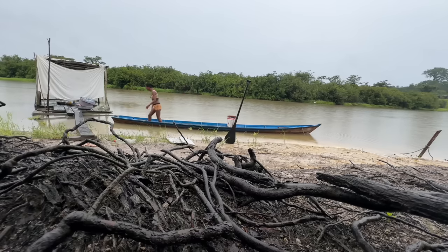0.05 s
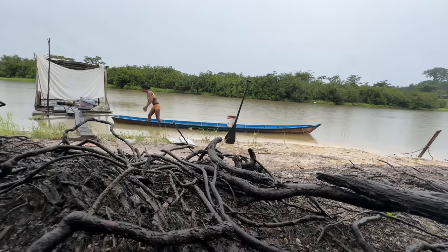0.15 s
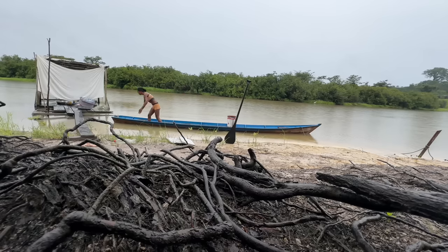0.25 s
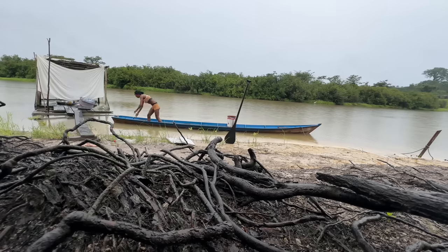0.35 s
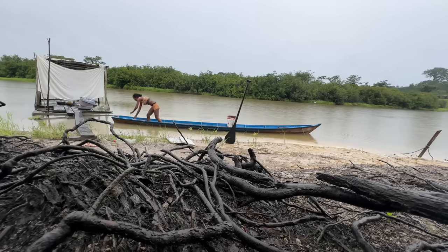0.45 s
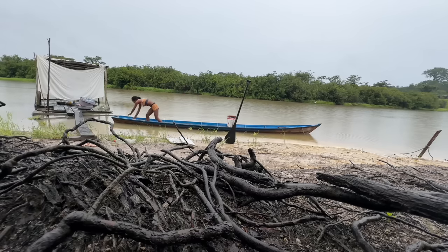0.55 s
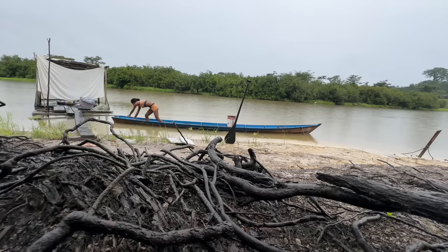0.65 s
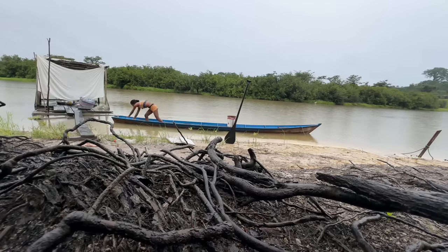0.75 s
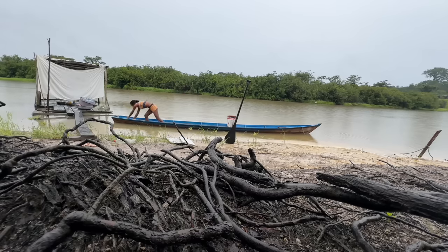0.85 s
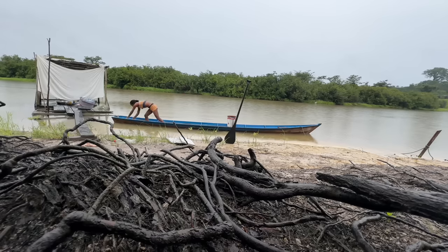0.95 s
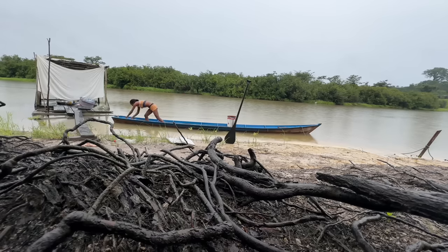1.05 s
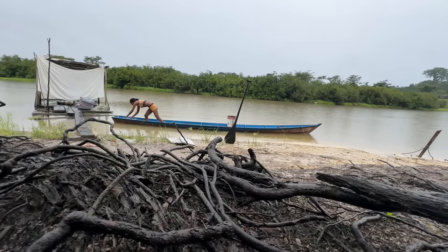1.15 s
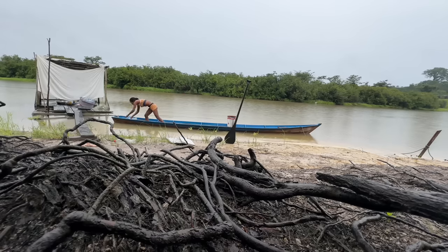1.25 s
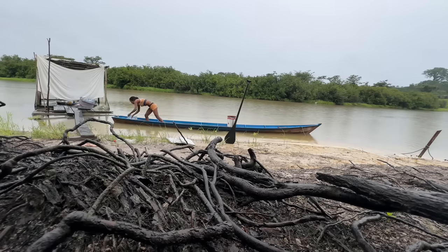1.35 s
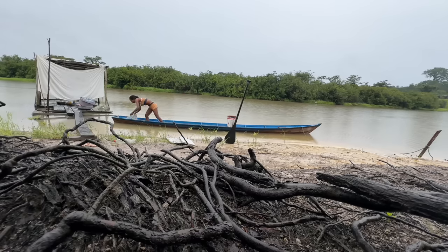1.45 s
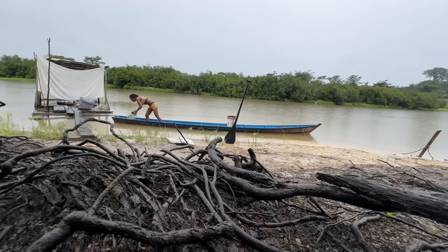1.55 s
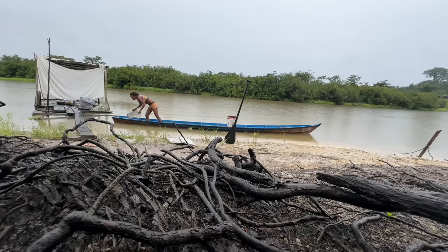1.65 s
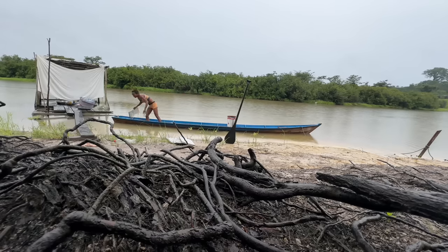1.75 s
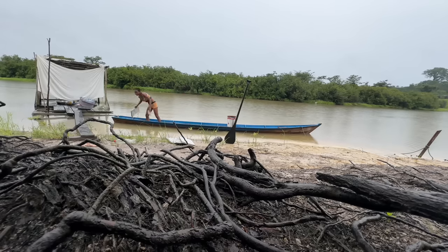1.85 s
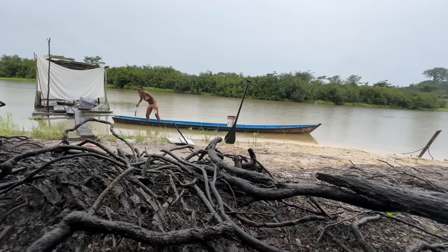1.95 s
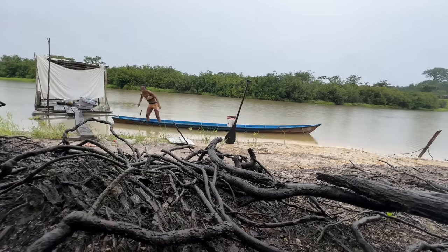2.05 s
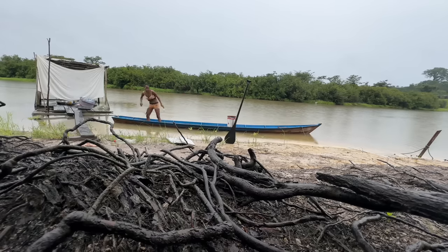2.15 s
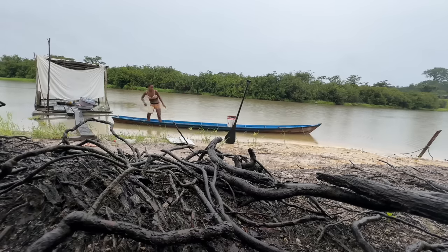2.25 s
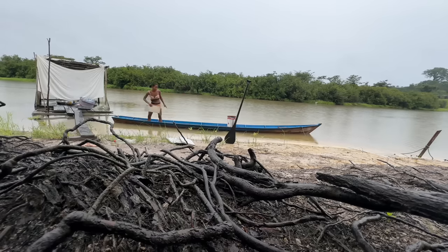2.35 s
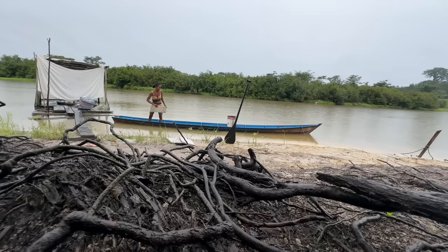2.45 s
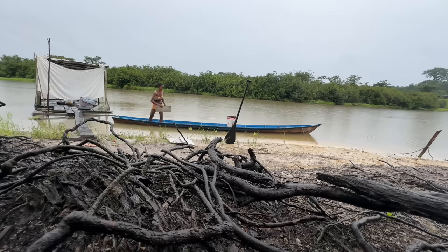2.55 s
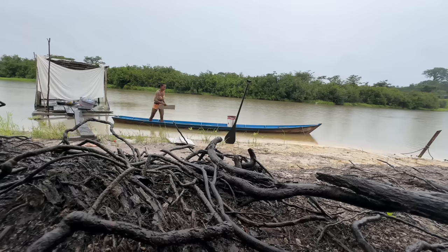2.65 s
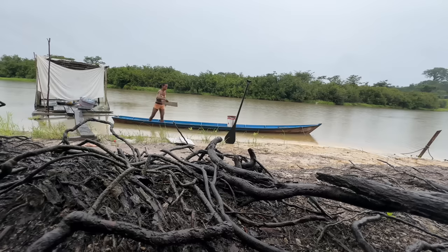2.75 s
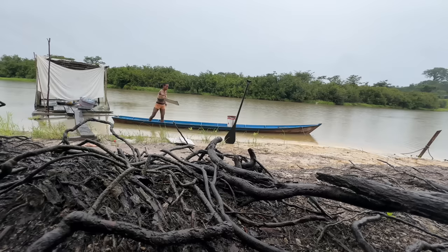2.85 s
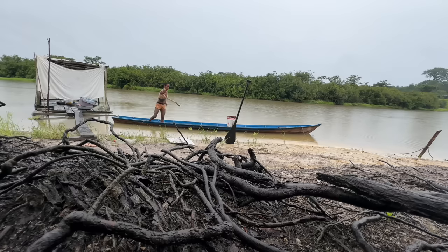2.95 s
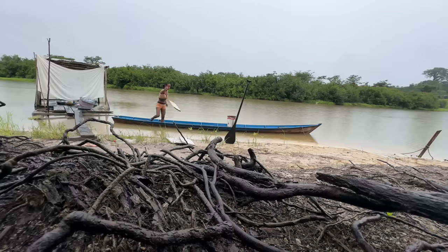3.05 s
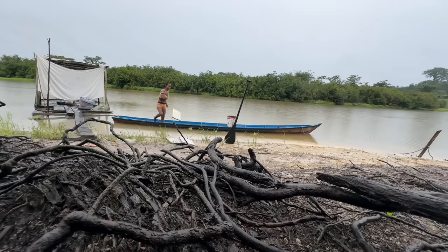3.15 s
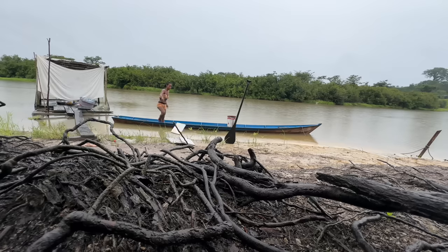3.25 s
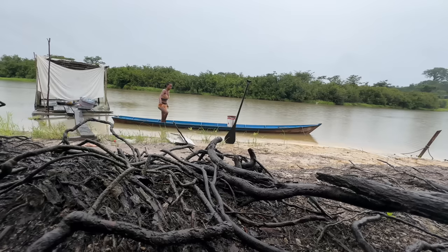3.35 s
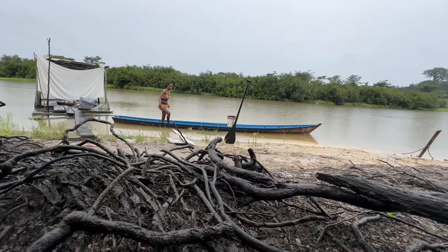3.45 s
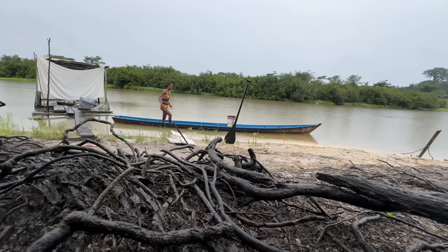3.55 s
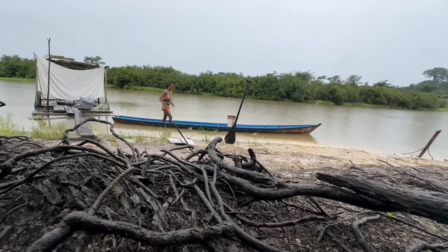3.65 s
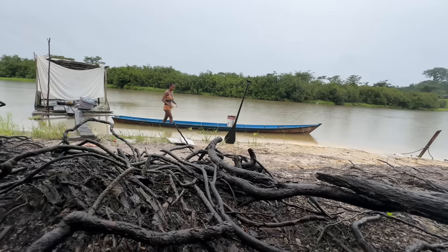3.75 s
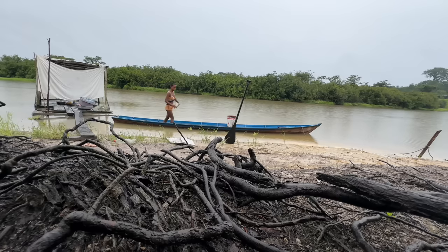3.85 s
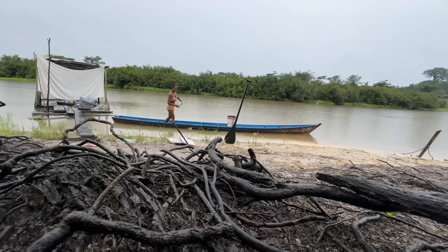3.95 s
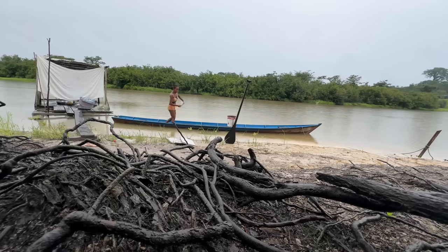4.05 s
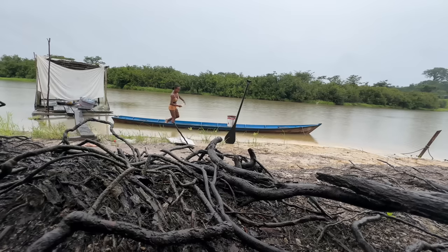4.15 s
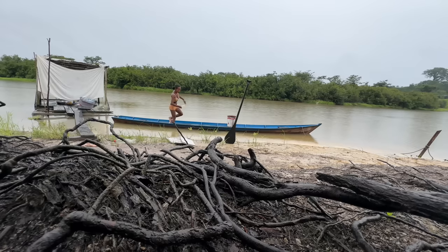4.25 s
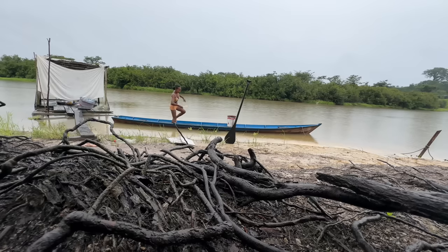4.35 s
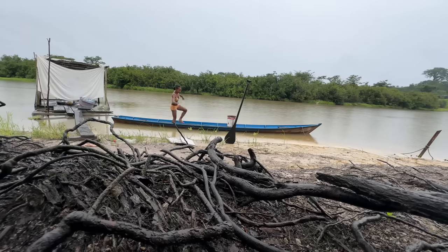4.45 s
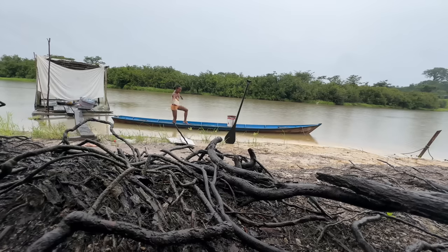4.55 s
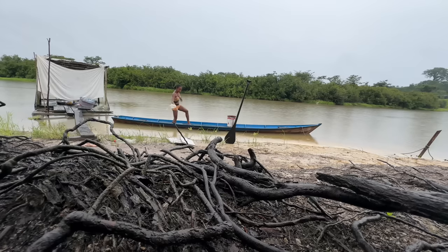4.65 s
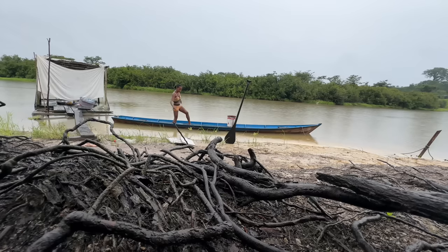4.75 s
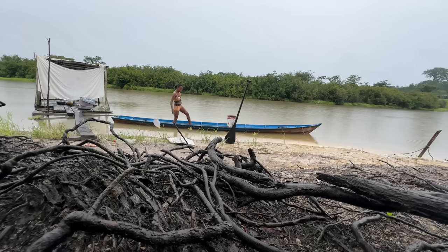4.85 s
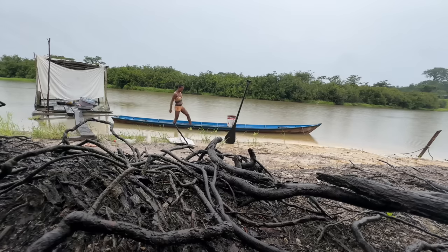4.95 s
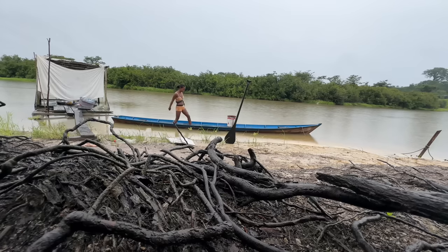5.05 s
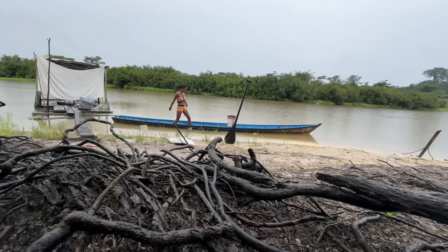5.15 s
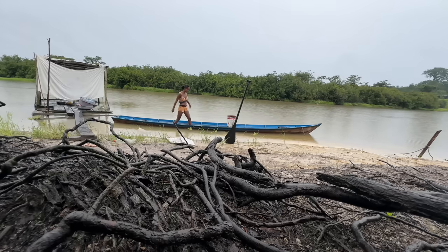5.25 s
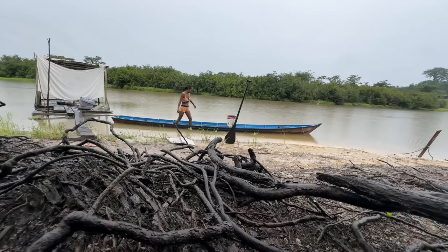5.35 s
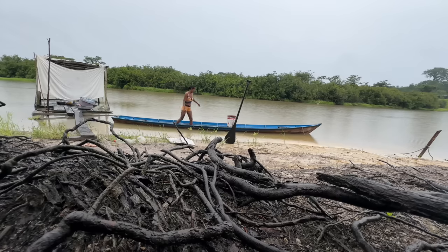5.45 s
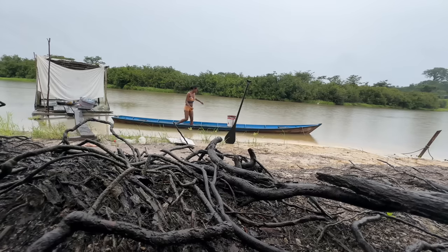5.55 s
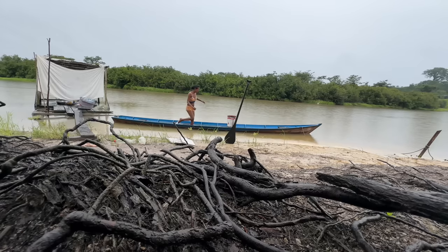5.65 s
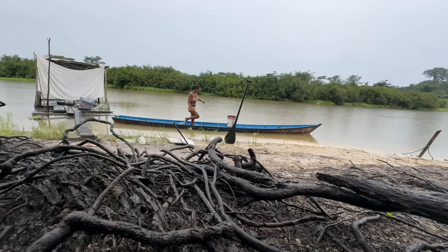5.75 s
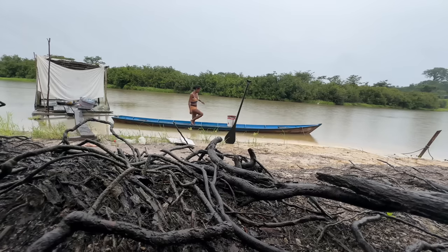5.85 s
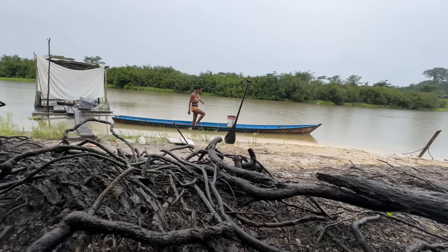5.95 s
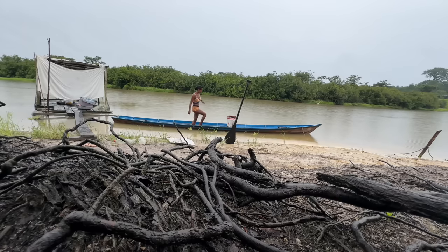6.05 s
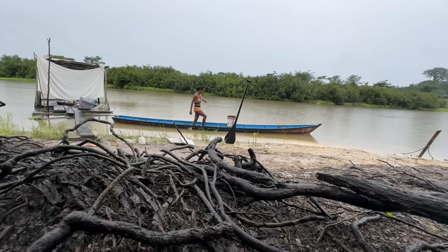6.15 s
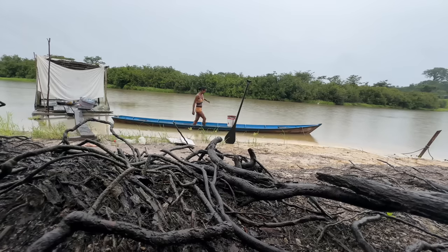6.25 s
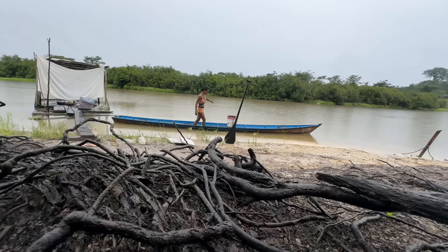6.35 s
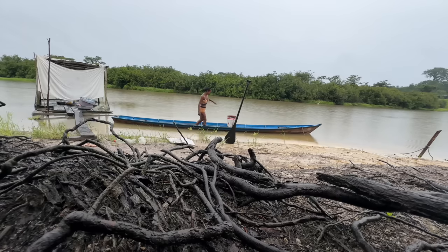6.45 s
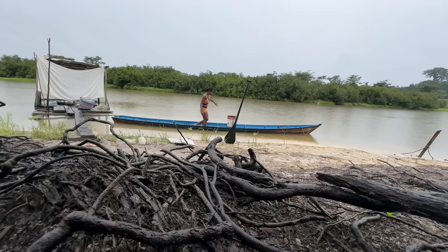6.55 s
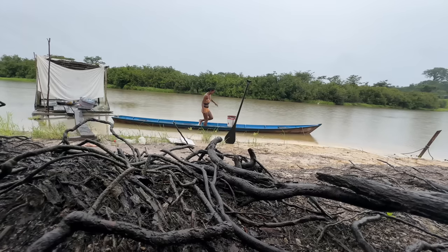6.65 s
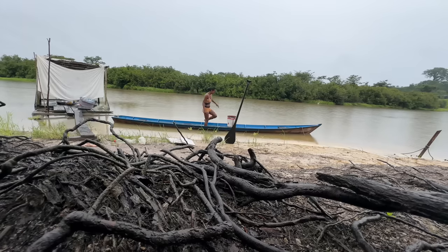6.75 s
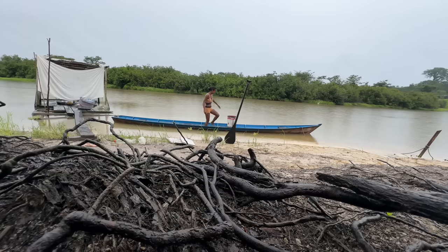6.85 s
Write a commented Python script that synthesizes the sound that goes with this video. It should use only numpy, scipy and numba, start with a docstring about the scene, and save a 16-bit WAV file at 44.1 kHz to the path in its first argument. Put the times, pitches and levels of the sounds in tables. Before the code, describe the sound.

A plastic bucket knocks a hollow canoe hull, then clatters hard when tossed, amid slaps, gurgles, drips and small splashes of water by a quiet river.

```python
"""A plastic bucket knocks, scoops and empties in a flooded canoe, while someone wades along the hull.
Water moves from the start; at about 1 s the bucket knocks the hull, and slaps, bubbles and spray follow.
Near 2.4 s a low rumble puffs and a far bird calls; at 3.3 s the tossed bucket bounces and its air rings.
At 4.8 s an air pocket closes with a rising glug, then drips and small splashes go on to the end.
Bucket, bubbles and calls are sine tones, slaps are noise bursts; river air and insects are steady filtered noise."""
import sys
import numpy as np
from scipy import signal
from scipy.fft import rfft, irfft
from scipy.io import wavfile
from scipy.ndimage import uniform_filter1d
from numba import njit

SR = 44100
rng = np.random.default_rng(int(sys.argv[2]) if len(sys.argv) > 2 else 0)


def unload_audio(sound):
    """Save the sound as a 16-bit wav file, at the path given as the first command line argument."""
    columns = np.transpose(np.atleast_2d(sound))
    # keep every value between -1 and 1, then stretch to whole-number steps
    steps = np.round(np.clip(columns, -1, 1) * 32767)
    wavfile.write(sys.argv[1], SR, steps.astype(np.int16))


N = 304731
T = np.arange(N) / SR


def undb(db):
    """Gain of a level in dB."""
    return 10 ** (np.asarray(db) / 20)


def unit(x):
    """Scales a sound to rms 1."""
    return x / np.sqrt(np.mean(x ** 2))


def noise(count=N):
    """White noise."""
    return rng.standard_normal(count)


def band(x, lo_hz, hi_hz, order=2):
    """Keeps the pitches between two limits (Butterworth band-pass)."""
    limits_hz = [lo_hz, min(hi_hz, .45 * SR)]
    return signal.sosfilt(signal.butter(order, limits_hz, "band", fs=SR, output="sos"), x)


def add(out, start_s, sound, peak_db):
    """Mixes a short sound in at its start time with its peak at peak_db."""
    i = int(start_s * SR)
    n = min(len(sound), N - i)
    out[i:i + n] += sound[:n] * undb(peak_db) / np.abs(sound).max()


def fade(t, t60_s):
    """Exponential decay, 60 dB in t60_s."""
    return np.exp(-np.log(1000) * t / t60_s)


def walk(per_s):
    """Random levels held briefly and joined by slopes, with rms 1."""
    hold = int(SR / per_s)
    steps = np.repeat(noise(N // hold + 1), hold)
    return unit(uniform_filter1d(steps, hold)[:N])


def swells(crest_s, db, rise_s, fall_s, calm_db=-120):
    """Level in dB of crests that climb and sink 20 dB in rise_s and fall_s, over a resting level."""
    coarse_t = T[::64]  # slow levels need few points
    late_s = coarse_t[:, None] - crest_s
    crest_db = db - 20 * np.maximum(-late_s / rise_s, late_s / fall_s)
    power = undb(2 * crest_db).sum(axis=1) + undb(2 * calm_db)
    return np.interp(T, coarse_t, 10 * np.log10(power))


@njit
def ring(count, rows, sr, swell_s):
    """Decaying sines with a soft start, from rows of (start_s, size, pitch_hz, t60_s, rise in octaves/s)."""
    out = np.zeros(count)
    for start_s, size, hz, t60_s, rise in rows:
        i, phase, step = int(start_s * sr), 0., 2 * np.pi * hz / sr
        climb, sink = 2 ** (rise / sr), 1000. ** (-1 / (t60_s * sr))
        # each sine is cut once it has sunk 40 dB
        for k in range(min(int(t60_s * sr * 2 / 3), count - i)):
            phase += min(step, .9 * np.pi)
            step *= climb
            size *= sink
            u = k / (swell_s * sr)
            out[i + k] += size * np.sin(phase) * (1 - np.exp(-u * u) if u < 3 else 1.)
    return out


def swarm(db, calm_db, per_s, lo_hz, hi_hz, cycles, scatter_db, bed_db, clump_db=0):
    """Short rising tones of random pitch and size over a hiss; at calm_db or below only the hiss is left."""
    start, pitch, size, glide = rng.random((int(per_s * N / SR), 4)).T
    hz = lo_hz * (hi_hz / lo_hz) ** pitch
    gain = undb(-scatter_db * np.log(1 - size))
    t60_s = cycles / hz
    rise = 1.2 * glide * hz / cycles  # octaves/s
    rows = np.column_stack([start * N / SR, gain, hz, t60_s, rise])
    tones = unit(ring(N, rows, 1. * SR, 0.52 / lo_hz))
    busy = np.clip((db - calm_db) / 8, 0, 1)  # 0 calm, 1 from 8 dB above calm
    hiss = undb(busy * bed_db) * unit(band(noise(), lo_hz, hi_hz))
    return undb(db + busy * clump_db) * (busy * tones + hiss)


def whistle(table):
    """A pure gliding tone through rows of (time_s, pitch_hz, level_db), with soft ends."""
    time_s, pitch_hz, level_db = np.transpose(table)
    hz = np.interp(T, time_s, pitch_hz)
    db = np.interp(T, time_s, level_db)
    within = 1. * ((T > time_s[0]) & (T < time_s[-1]))
    gate = uniform_filter1d(within, size=300)
    return np.sqrt(2) * gate * undb(db) * np.sin(2 * np.pi * np.cumsum(hz) / SR)


# tone colour of the river air: pitch_hz, relative_level_db (per Hz)
AIR_COLOUR = [(35, -31), (60, 2.5), (244, -27.5), (354, -2.5), (480, -23.5), (748, -16.5), (3040, -20.5),
              (3750, -19.5), (6120, -24), (7040, -28), (7550, -42), (12000, -29), (15900, -40.5)]
AIR_DB = -77.5  # rms of the whole air


def river_air():
    """Steady noise shaped to the colour of the riverbank."""
    point_hz, point_db = np.transpose(AIR_COLOUR)
    hz = np.maximum(np.arange(N // 2 + 1) * SR / N, 1)
    colour_db = np.interp(np.log(hz), np.log(point_hz), point_db)
    air = irfft(rfft(noise()) * undb(colour_db), N)
    return undb(AIR_DB) * unit(air)


# insect bands: centre_hz, width_hz, middle_level_db
INSECT_BANDS = [(5650, 350, -89), (7000, 350, -85.5)]


def insects():
    """Narrow bands of noise whose levels waver a little."""
    out = np.zeros(N)
    for centre_hz, width_hz, db in INSECT_BANDS:
        buzz = unit(band(noise(), centre_hz - width_hz / 2, centre_hz + width_hz / 2))
        out += undb(db + 0.98 * walk(14)) * buzz
    return out


# points along the bird call: time_s, pitch_hz, level_db
BIRD_CALL = [(2.48, 3180, -80), (2.51, 3711, -85), (2.546, 3821, -83.5), (2.634, 3700, -84.5),
             (2.66, 3350, -91), (2.68, 3372, -85)]


def bird():
    """A faint far call: one pure tone gliding between the points."""
    return whistle(BIRD_CALL)


# low rumble, wind puffs and the thumps of knocks: crest_s, level_db (before it wanders)
LOW_RUMBLES = [(0.23, -53), (0.44, -56), (0.57, -59), (0.75, -58), (0.92, -64), (1.13, -56), (1.56, -76.5),
               (2.1, -64), (2.251, -57), (2.3, -62), (2.35, -55), (2.385, -54.5), (2.42, -46.5),
               (2.47, -62), (2.54, -69), (2.64, -68.5), (3.35, -56), (3.71, -58.5), (3.96, -63.5),
               (4.2, -61.5), (5.04, -68), (5.35, -70.5), (5.489, -59.5), (5.66, -67), (5.81, -65)]
RUMBLE_RISE_S, RUMBLE_FALL_S = 0.024, 0.022  # over 20 dB
RUMBLE_CALM_DB, RUMBLE_WANDER_DB = -80, 3.5


def low_rumble():
    """Wind puffs and the thumps of knocks: many short, very low tones over low noise."""
    crest_s, db = np.transpose(LOW_RUMBLES)
    crests_db = swells(crest_s, db, RUMBLE_RISE_S, RUMBLE_FALL_S, RUMBLE_CALM_DB)
    rumble_db = crests_db + RUMBLE_WANDER_DB * walk(12)
    return swarm(rumble_db, calm_db=-99, per_s=30, lo_hz=24, hi_hz=70, cycles=4, scatter_db=0.85, bed_db=-1.5)


# low booms of the hull after knocks, with some low gurgling: crest_s, level_db, fall_s (over 20 dB)
HULL_BOOMS = [(0.01, -74, 1), (0.9, -59, .5), (1.09, -53.5, 0.17), (1.191, -49.5, 0.18), (1.5, -70.5, 0.8),
              (3.44, -48, 0.15), (3.58, -51, 0.24), (3.75, -68, 0.3), (5.5, -79, 0.5)]
BOOM_RISE_S, BOOM_CALM_DB = 0.068, -79.5  # rise over 20 dB


def hull_boom():
    """The hollow hull booms low after knocks, with some low gurgling: a swarm of low tones in low noise."""
    crest_s, db, fall_s = np.transpose(HULL_BOOMS)
    boom_db = swells(crest_s, db, BOOM_RISE_S, fall_s, BOOM_CALM_DB)
    return swarm(boom_db, calm_db=-99, per_s=120, lo_hz=110, hi_hz=560, cycles=9.5, scatter_db=1.9, bed_db=2.4)


WASH_START_DB, WASH_FALL_S = -64, 2.0  # fall over 20 dB


def wash():
    """Foam of an earlier splash drains away as a smooth fading hiss."""
    return undb(WASH_START_DB - 20 * T / WASH_FALL_S) * unit(band(noise(), 550, 4000))


# water rocking in the hull: crest_s, level_db, rise_s, fall_s (both over 20 dB)
HULL_GURGLES = [(0.005, -54, .03, 0.022), (0.2, -68, 0.065, 0.95), (0.434, -64.5, 0.092, .14),
                (0.53, -60.5, 0.046, 0.048), (0.84, -61.5, .04, 0.013), (1.17, -50, 0.018, 0.36),
                (1.35, -46.5, .2, 0.044), (1.46, -53, 0.25, 0.059), (1.58, -59.5, 0.041, 0.29),
                (1.77, -64, 0.027, .09), (1.87, -69.5, .05, .04), (2.14, -73, 0.37, .1),
                (2.819, -71, 0.028, 0.21), (3.11, -65.5, 0.042, .14), (4.08, -59.5, .04, 0.13),
                (4.164, -46, .04, 0.039), (4.21, -46, 0.048, 0.045), (4.41, -65.5, .08, .13),
                (4.85, -65, 0.069, .06), (5.03, -43.5, 0.025, 0.067), (5.1, -55.5, 0.08, .05),
                (5.44, -49.5, .03, 0.12), (5.62, -69.5, 0.22, .2), (6.11, -65.5, .02, .03),
                (6.2, -71, .02, 0.38), (6.35, -65, .06, .04), (6.63, -66, 0.049, .03),
                (6.7, -69, 0.022, 0.23)]
HULL_HZ, HULL_WIDTH_HZ = 535, 55  # width to each side


def gurgle():
    """Bubbles of rocking water, coloured by the hull's own pitch."""
    lumps = swarm(0, calm_db=-20, per_s=160, lo_hz=460, hi_hz=620, cycles=25, scatter_db=1.2, bed_db=-6)
    coloured = unit(band(lumps, HULL_HZ - HULL_WIDTH_HZ, HULL_HZ + HULL_WIDTH_HZ, order=1))
    return coloured * undb(swells(*np.transpose(HULL_GURGLES)))


# surges of moving water: crest_s, splash_db, slosh_above_splash_db, spray_above_splash_db,
# rise_s, fall_s (both over 20 dB)
WATER_SURGES = [(0.02, -68.5, -2.5, -8.5, 0.098, 1.9), (0.859, -61, 4, 4, 0.043, 0.14),
                (0.91, -60.5, 0.5, 3, 0.084, 0.067), (1.054, -54.5, 1, -0.5, 0.042, 0.28),
                (1.144, -59.5, 9, -4.5, .1, 0.67), (1.58, -59, -1, -5.5, 0.73, 0.28),
                (1.786, -62, -7, -3.5, 0.46, 0.23), (2.116, -74, 0.5, -2.5, .5, .6),
                (2.849, -65.5, 5.5, -12, 0.053, 0.077), (3.02, -66, -9, -11.5, 0.1, 0.65),
                (3.19, -61, 0.5, -7, .3, 0.19), (3.419, -54.5, 7, -11, 0.042, 0.11),
                (3.556, -65, 10, -2, 0.084, 0.22), (3.664, -57, -7, -6, 0.28, 0.22),
                (4.15, -61.5, 5.5, -9.5, 0.058, .15), (4.21, -61.5, -2, -14, .06, 0.19),
                (4.3, -64, -9, -7, 0.31, 0.34), (4.75, -67.5, -7.5, -7.5, .05, .5),
                (4.95, -79, 3, -6, .3, 0.38), (5.05, -68.5, -2.5, -1, 0.15, 0.16),
                (5.44, -68, 3, -8, 0.25, 0.29), (5.645, -62.5, -8, -13, 0.063, .3),
                (5.78, -62.5, -10.5, -10, .06, 0.39), (5.878, -63.5, -6.5, -13.5, 0.23, 0.35),
                (5.962, -67, -8.5, 1, .2, 0.16), (6.27, -68.5, -6, -7.5, 0.067, .9),
                (6.615, -59.5, -5, -11.5, 0.054, 0.31), (6.7, -58, -4, -12.5, .1, 0.16),
                (6.82, -66, -7, -3.5, .08, 0.48)]
SLOSH_CALM_DB, SPLASH_CALM_DB, SPRAY_CALM_DB, MIST_CALM_DB = -76, -74.5, -78.5, -87.5
MIST_DB, DROPS_DB = -12.5, -7.5  # mist against spray; lone drops against splash


def surges():
    """Moving water makes bubbles, the smaller ones higher and shorter; bursting films crackle."""
    crest_s, db, slosh, spray, rise_s, fall_s = np.transpose(WATER_SURGES)
    slosh_db = swells(crest_s, db + slosh, rise_s, fall_s, SLOSH_CALM_DB)
    splash_db = swells(crest_s, db, rise_s, fall_s, SPLASH_CALM_DB)
    spray_db = swells(crest_s, db + spray, rise_s, fall_s, SPRAY_CALM_DB)
    mist_db = swells(crest_s, db + spray + MIST_DB, rise_s, fall_s, MIST_CALM_DB)
    # drops fall in clumps that most layers share; slosh, splash and spray also bunch alone
    clump_db = 2.3 * walk(24)
    out = swarm(slosh_db, calm_db=-78, per_s=150, lo_hz=650, hi_hz=1500, cycles=26,
                scatter_db=2.4, bed_db=-5.5, clump_db=.6 * clump_db + 1.5 * walk(20))
    out += swarm(splash_db, calm_db=-78, per_s=340, lo_hz=1300, hi_hz=4000, cycles=38,
                 scatter_db=2.9, bed_db=-6, clump_db=clump_db + 1.5 * walk(25))
    # lone drops
    out += swarm(splash_db + DROPS_DB, calm_db=-83.5, per_s=30, lo_hz=900, hi_hz=5500, cycles=50,
                 scatter_db=2.0, bed_db=-29)
    out += swarm(spray_db, calm_db=-81, per_s=380, lo_hz=4000, hi_hz=8000, cycles=45,
                 scatter_db=2.8, bed_db=-5, clump_db=clump_db + 1.5 * walk(30))
    # crackle of films: only about three cycles each
    out += swarm(spray_db - 1.5, calm_db=-82.5, per_s=120, lo_hz=2500, hi_hz=9000, cycles=3.1,
                 scatter_db=2.9, bed_db=-29.5, clump_db=clump_db)
    # mist
    out += swarm(mist_db, calm_db=-89, per_s=500, lo_hz=8000, hi_hz=14000, cycles=30,
                 scatter_db=3.0, bed_db=-3, clump_db=clump_db)
    return out


# bubbles, drips and brief rings of the knocked bucket:
# start_s, level_db (before decay), start_pitch_hz, t60_s, rise (octaves/s)
SHORT_TONES = [(0.012, -38, 1174, 0.039, 1), (0.013, -46, 303, 0.053, 1), (0.074, -48.5, 1350, 0.052, 15),
               (0.15, -46.5, 946, .036, 6), (0.181, -47, 2830, 0.032, 5), (0.211, -38.5, 1280, .045, 18.5),
               (0.298, -51.5, 670, 0.22, 2.5), (0.873, -42, 2190, .037, 0.5), (0.971, -27, 447, 0.048, -2),
               (1.108, -35.5, 3320, 0.03, 22), (1.13, -19, 190, 0.081, 0.5), (1.14, -39, 4700, .03, 0),
               (1.142, -37, 3250, .024, 11), (1.146, -42, 8330, .014, 1.1), (1.18, -42, 4040, .024, 7),
               (1.188, -36, 1070, 0.035, 33), (1.193, -32.5, 1460, 0.023, 13),
               (1.209, -41.5, 3770, 0.036, 13), (1.217, -37.5, 1090, 0.035, 12),
               (1.218, -39, 2280, .024, 15), (1.226, -37.5, 3250, .025, 11), (1.254, -38, 800, 0.061, 0),
               (1.306, -31, 199, 0.17, -3), (1.312, -32, 686, 0.03, 5), (1.344, -37.5, 370, 0.21, 2.5),
               (1.376, -36.5, 1780, 0.024, 24), (1.448, -38, 1940, 0.011, 15), (1.453, -39, 865, 0.02, 23),
               (1.473, -40, 2710, .035, 37), (1.492, -48, 7680, .018, 1.1), (1.523, -37.5, 1910, .024, 9),
               (1.573, -33.5, 813, 0.044, 0), (1.619, -38, 3120, 0.024, 13), (1.667, -40, 3500, .018, 6),
               (1.683, -41, 905, .036, -4), (1.698, -45, 2630, .034, 8), (1.759, -36.5, 4190, 0.023, 2.5),
               (1.776, -45.5, 3560, 0.026, 5), (1.967, -46, 1455, 0.016, 25),
               (2.116, -43, 700, 0.055, -4.5), (2.152, -43.5, 710, 0.07, 2.5), (2.338, -47, 721, 0.037, -8),
               (2.82, -57.5, 801, .15, 2), (2.984, -35.5, 1155, 0.018, 8.5), (3.055, -43.5, 2870, .016, 4),
               (3.096, -44.5, 4070, .026, 22), (3.112, -48, 1730, 0.034, -3), (3.145, -39.5, 1540, .03, 21),
               (3.224, -42.5, 2870, .033, 21), (3.253, -45, 2220, 0.035, 5), (3.311, -37.5, 3880, 0.015, 1),
               (3.55, -25.5, 604, 0.099, 5), (3.603, -35, 1740, .02, 23), (3.629, -35, 2680, .016, 7.5),
               (3.64, -37, 387, 0.058, 8), (3.649, -32, 2030, 0.014, 6), (3.649, -5.5, 5500, 0.0037, -15),
               (3.731, -37, 3000, .014, 14), (3.772, -28, 2670, .0093, -2),
               (3.886, -31.5, 3030, 0.0091, 11), (3.939, -49.5, 1262, .045, 24),
               (4.154, -39, 2170, 0.02, 9), (4.207, -42, 1780, .041, 2.5), (4.232, -44, 1690, 0.057, 1.1),
               (4.328, -39, 2830, 0.019, 0.5), (4.528, -49, 2800, .015, 3), (4.58, -52.5, 3140, 0.02, 3),
               (4.676, -47.5, 2370, 0.016, 12.5), (4.747, -28, 1058, 0.01, 21.5),
               (4.811, -47, 2330, .018, 5.5), (4.824, -45.5, 2010, 0.043, 3.5), (4.848, -42, 428, .1, 0.7),
               (4.908, -45.5, 2320, 0.011, 16.5), (4.978, -46, 4900, 0.011, 1), (5.434, -42, 1063, .027, 2),
               (5.534, -46, 1374, 0.018, 1.5), (5.615, -47.5, 998, .026, 1),
               (5.638, -42.5, 1022, 0.028, 18), (5.68, -48, 1500, .02, 3), (5.77, -47, 1584, 0.027, 4.5),
               (5.784, -40.5, 3550, 0.011, -4), (5.847, -51.5, 2065, .066, 6.5),
               (5.889, -45.5, 4690, 0.02, 7), (5.893, -44, 1270, 0.027, 2.5), (5.934, -48, 4610, 0.031, 10),
               (5.944, -42.5, 2740, 0.033, 3), (5.988, -45, 673, 0.032, 25), (6.034, -40, 2630, .018, 3),
               (6.107, -45, 1873, .028, 7), (6.262, -48, 395, 0.084, -18.5),
               (6.267, -34.5, 1084, 0.036, 0.5), (6.284, -46, 4180, .017, 18.5),
               (6.349, -54, 310, 0.098, 2), (6.45, -47, 4220, 0.017, 8.5), (6.513, -40, 1654, 0.029, 4),
               (6.517, -46, 2200, .027, -5), (6.56, -48.5, 1926, .03, 18), (6.613, -44, 1643, .03, -4.5),
               (6.615, -46.5, 2410, .048, -11.5), (6.624, -45, 3250, .019, 1),
               (6.667, -39, 925, 0.026, 27.5), (6.729, -48.5, 823, 0.043, -1),
               (6.792, -37.5, 2705, .014, 1.5)]


def short_tones():
    """Short decaying tones: bubbles, drips and brief rings of the knocked bucket, most of them rising."""
    start_s, db, hz, t60_s, rise = np.transpose(SHORT_TONES)
    rows = np.column_stack([start_s, undb(db), hz, t60_s, rise])
    return ring(N, rows, 1. * SR, 0.001)


# points along the closing of an air pocket: time_s, pitch_hz, level_db
AIR_POCKET = [(4.848, 425, -50), (4.88, 440, -61.5), (4.905, 493, -66), (4.925, 700, -63.5),
              (4.945, 980, -65), (4.96, 1110, -64.5), (4.975, 1170, -71)]


def glug():
    """The shrinking air pocket sings higher as it closes."""
    return whistle(AIR_POCKET)


# slaps of water on water: start_s, level_db (of a band at the full brightness),
# brightness (0 dull, 1 middle, 2 and up top), t60_s (before each band shortens it)
WATER_SLAPS = [(0.0094, -27.5, 1, .022), (0.0662, -44, .1, 0.047), (0.853, -37.5, 0.99, 0.25),
               (0.9713, -11.5, 0.6, 0.03), (1.05, -34.5, 1.1, 0.19), (1.1485, -39, 1.6, .03),
               (1.216, -42, .1, 0.026), (1.431, -37, 4, 0.027), (1.4934, -35.5, 2, 0.063),
               (1.5444, -41.5, 1, 0.022), (1.6191, -35.5, 1.14, 0.027), (1.739, -35, 1.2, 0.074),
               (1.813, -48, 1.3, .02), (1.8608, -34, 2.15, 0.091), (1.9674, -42, 1.05, 0.018),
               (2.05, -50, 1.2, .027), (2.1, -55, 2.5, 0.034), (2.8456, -39.5, 0.4, 0.066),
               (3.3274, -17.5, -0.07, 0.097), (3.379, -15.5, -0.3, 0.046), (3.3938, -19.5, -0.2, .03),
               (3.4688, -36.5, 0.7, 0.033), (3.5216, -39.5, 0.1, 0.044), (3.6003, -39, 2.5, 0.034),
               (3.6479, -26, 1.5, 0.02), (3.697, -31.5, 1, 0.027), (3.8856, -29.5, 0.49, 0.014),
               (3.953, -39.5, 0.45, 0.027), (4.1248, -45.5, -0.6, 0.12), (4.2074, -39.5, .1, 0.028),
               (4.3242, -45, .05, 0.022), (4.6244, -38, 1.8, 0.051), (4.7469, -33, 0.3, 0.02),
               (4.8474, -39.5, 1.9, .03), (5.017, -20, 0.83, 0.082), (5.432, -40, 0.2, 0.1),
               (5.8886, -42, 1.1, 0.043), (5.931, -45, 1.3, .02), (5.9449, -42.5, 2.8, 0.011),
               (5.988, -44, 1.1, .02), (6.0338, -37.5, 0.6, .015), (6.107, -35, 0.34, 0.025),
               (6.2669, -36.5, 0.26, 0.026), (6.4274, -49, 1.2, .03), (6.5131, -41, -0.4, 0.029),
               (6.8498, -51, 1.1, .056)]
SLAP_RISE_MS, SLAP_SLOPE_DB = 4.7, 14  # slope: loss per step of brightness away from the slap's own


def slaps():
    """Water slapping water: noise bursts in three bands; the finer, higher drops die sooner."""
    out, t = np.zeros(N), T[:SR // 5]
    start = np.tanh(t * 1000 / SLAP_RISE_MS) ** 2
    # lo_hz, hi_hz, brightness of the band, share of the decay time
    bands = [(1080, 3020, 0, 0.96), (3050, 5330, 1.04, 0.38), (5500, 8400, 2.5, 0.27)]
    for start_s, db, bright, t60_s in WATER_SLAPS:
        burst = noise(len(t)) * start
        for lo_hz, hi_hz, place, last in bands:
            spray = band(burst * fade(t, t60_s * last), lo_hz, hi_hz)
            add(out, start_s, spray, db - SLAP_SLOPE_DB * abs(place - bright))
    return out


# air in the rolling bucket: time_s, pitch_hz, level_db
BUCKET_AIR = [(3.519, 590.3, -45), (3.548, 594.5, -47), (3.553, 606.6, -24), (3.58, 614, -39),
              (3.61, 625, -46), (3.635, 610, -58)]


def bucket_air():
    """The air inside the rolling bucket rings as one gliding tone."""
    return whistle(BUCKET_AIR)


# bucket knocks: start_s, peak_db, centre_hz (of the modes struck), spread_octaves, contact_ms, ring_factor
BUCKET_KNOCKS = [(0.854, -34, 470, 0.32, 3.6, 1.6), (0.915, -35, 118, 1.1, 6.8, 1.8),
                 (0.9697, -13, 960, 1.3, 5.9, 0.33), (1.083, -21.5, 630, 0.64, 6.5, 1.67),
                 (1.12, -10, 413, 0.43, 3.7, 0.75), (1.282, -34.5, 272, 0.6, 5.8, 1.6),
                 (1.31, -30, 308, 0.57, 7.7, 1.6), (3.33, 2, 590, 1.17, 9, 0.29),
                 (3.339, -2, 773, 0.68, 4.7, 0.22), (3.375, 1.5, 1010, 1.03, 3, 0.57),
                 (3.393, -6.5, 660, 1, 5.8, 0.71), (3.418, -27.5, 890, 1.1, 5, 1.7),
                 (3.453, -23.5, 1270, 0.35, 1.8, 0.14), (3.47, -30.5, 505, 0.71, 5, 0.34),
                 (3.519, -27, 573, 0.73, 6.5, 1.1), (3.550, -22, 750, 0.52, 2, 0.44),
                 (3.602, -29, 650, 0.49, 2.9, 0.5), (3.671, -21, 654, 0.26, 2.8, 0.51),
                 (3.697, -13, 666, 0.96, 3.14, 0.17), (3.793, -22, 514, 0.82, 6.6, 0.2),
                 (3.954, -37.5, 198, 1.2, 2.3, 0.33), (4.126, -35, 850, 0.68, 2.1, 0.49),
                 (4.746, -42, 1137, 0.29, 4.1, 0.33), (5.019, -29.5, 768, 0.9, 10.8, 0.82),
                 (5.041, -49.5, 131, 0.89, 21, 3.4), (4.20, -48.5, 145, .6, 5.3, 0.69),
                 (5.49, -55, 109, 0.55, 6.7, .6)]
# the bucket's own modes: pitch_hz, relative_level_db, t60_s (before a knock's ring factor)
BUCKET_MODES = [(86, 3, .09), (107, 0.5, 0.045), (152, 2, 0.027), (188, -7, 0.072), (254.4, -7, 0.15),
                (326, 2.5, 0.025), (410.4, -1, 0.065), (498, -3.5, 0.036), (590, 0, 0.049),
                (764, -1.5, 0.077), (880.6, 2.5, 0.011), (952, -3.5, 0.11), (1094, 2, 0.027),
                (1317, -2, 0.082), (1612, -4, 0.11), (1958, -2.5, 0.075), (2100, -12.5, 0.075),
                (2520, -21, 0.014), (2890, -13, 0.033), (3315, -14, 0.018), (3800, -16, 0.021),
                (5240, -3, .025)]


def bucket():
    """Each knock is a short rattling contact that drives the modes near its centre pitch."""
    out, t = np.zeros(N), T[:SR // 5]
    hz, mode_db, t60_s = np.transpose(BUCKET_MODES)[:, :, None]
    for start_s, peak_db, centre_hz, spread, contact_ms, ring_factor in BUCKET_KNOCKS:
        contact_s = contact_ms / 1000
        share = undb(mode_db - 6.5 * np.abs(np.log2(hz / centre_hz) / spread) ** 1.4)
        # the rattle shakes each phase, 400 random steps a second, until 3.9 contact times have passed
        step = np.minimum(t, 3.9 * contact_s) * 400
        paths = np.cumsum(0.94 * rng.standard_normal((len(BUCKET_MODES), 40)), axis=1)
        shake = np.array([np.interp(step, np.arange(40), path) for path in paths])
        # modes build up during the contact and die away after it
        build = np.tanh(2.0 * t / contact_s)
        swing = build * fade(np.maximum(t - contact_s, 0), t60_s * ring_factor)
        modes = share * swing * np.sin(2 * np.pi * hz * t + shake)
        add(out, start_s, band(np.sum(modes, axis=0), 70, 4900, order=3), peak_db)
    return out


ECHO_T60_S, ECHO_DB = 0.082, -18


def echo(near):
    """The hollow hull and the water surface smear near sounds: a short fading noise tail."""
    t = T[:SR // 3]
    tail = band(noise(len(t)) * fade(t, ECHO_T60_S), 200, 2500, order=1)
    tail = tail / np.sqrt(np.sum(tail ** 2))
    return undb(ECHO_DB) * signal.fftconvolve(near, tail)[:N]


def scene():
    """Near water and bucket sounds with their echo, over the riverbank, low rumble and hull boom."""
    background = river_air() + insects() + bird() + low_rumble() + hull_boom()
    moving_water = wash() + gurgle() + surges() + glug() + slaps()
    near = moving_water + short_tones() + bucket_air() + bucket()
    return (background + near + echo(near))[None]


TOP_HZ = 15800


def record(dry):
    """The recorder rounds the loudest peaks and cuts the top."""
    rounded = .98 * np.tanh(dry / .98)
    return signal.sosfilt(signal.ellip(8, .2, 70, TOP_HZ, fs=SR, output="sos"), rounded)


dry = scene()
out = record(dry)
unload_audio(out)
```